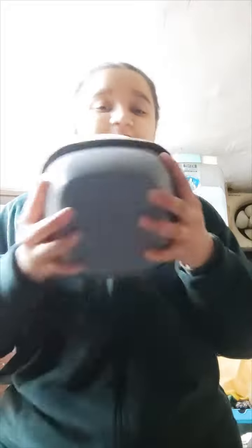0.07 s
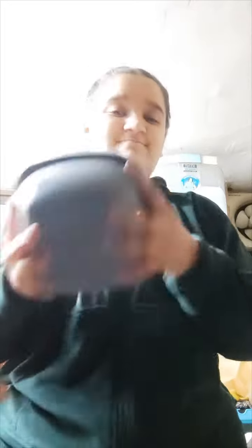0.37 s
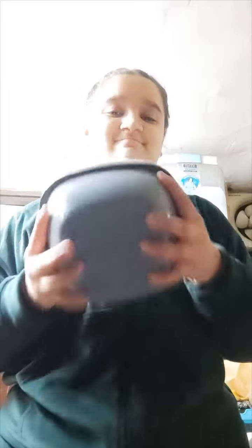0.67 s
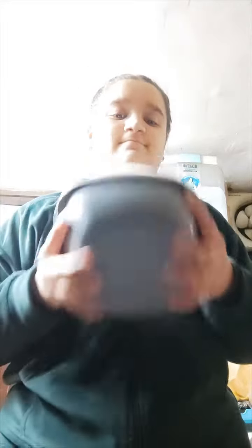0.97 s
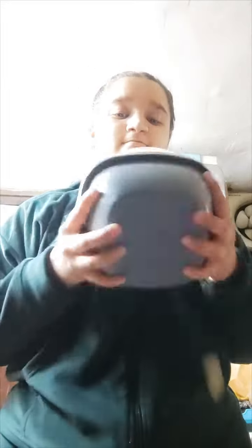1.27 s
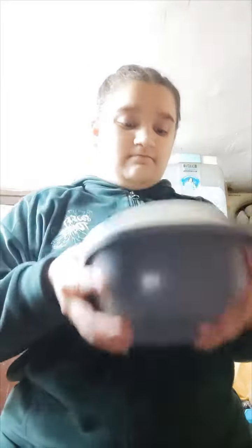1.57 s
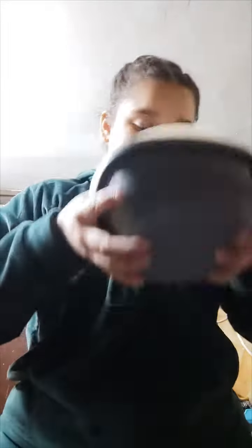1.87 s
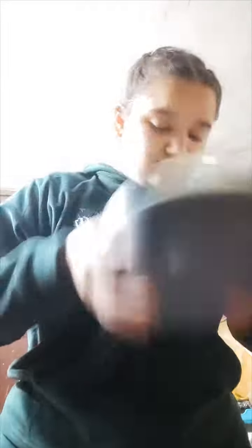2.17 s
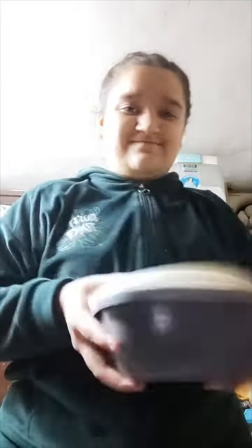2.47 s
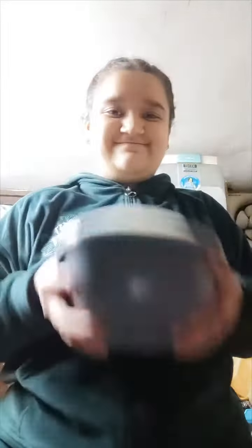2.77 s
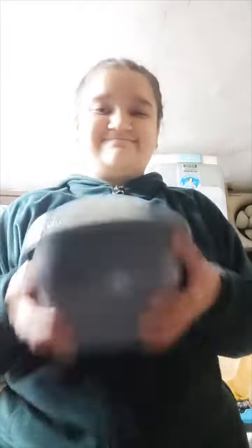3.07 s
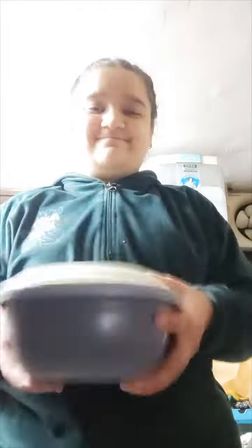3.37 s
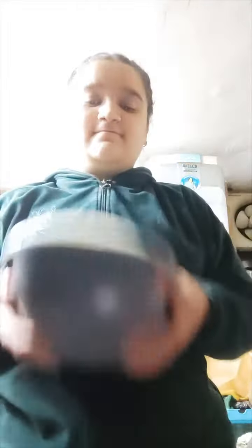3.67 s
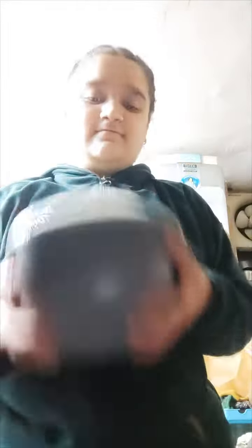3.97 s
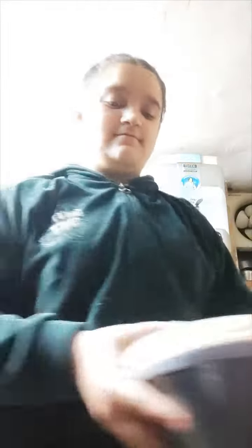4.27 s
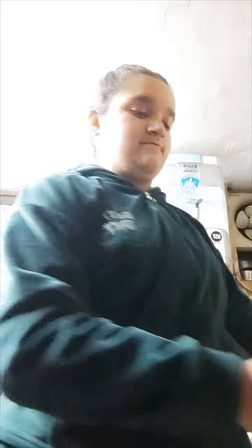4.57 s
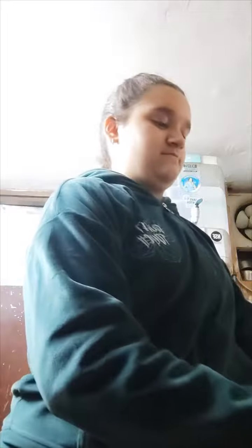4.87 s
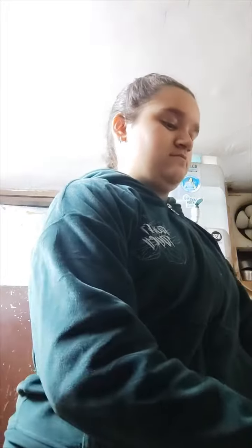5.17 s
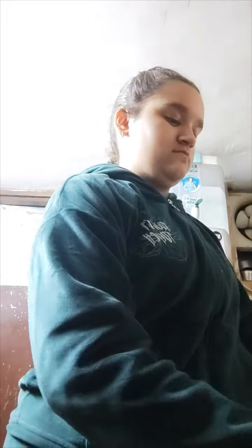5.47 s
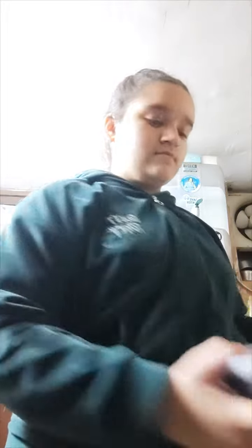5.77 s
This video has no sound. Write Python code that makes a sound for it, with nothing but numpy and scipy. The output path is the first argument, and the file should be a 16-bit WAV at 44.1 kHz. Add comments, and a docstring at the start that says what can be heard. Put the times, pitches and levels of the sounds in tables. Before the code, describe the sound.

Potato chips are shaken hard in a lidded plastic bowl, four to five strokes a second. Each stroke patters against the lid and crashes back with a crunch and a hollow thump. The shaking pauses briefly as the chips settle, then comes a second run. Finally the bowl is put down on a table with a few knocks and a short scrape. It is all close to the microphone in a small room.

```python
"""Potato chips are shaken in a lidded plastic bowl, in two runs of four to five strokes a second.
On each stroke they patter on the lid, then crash back and thump the bottom: many brief impacts
sum to a crunch, and the landing heap excites the normal modes of the bowl and the air in it.
The sound moves from the lid, on the right, to the bottom, on the left. Put down, the bowl rings with
a few knocks, and friction drives its modes in a short scrape. All is heard close by in a small room."""
import sys
import numpy as np
from scipy import signal
from scipy.fft import rfft, irfft
from scipy.io import wavfile
from scipy.ndimage import uniform_filter1d

SR = 44100
rng = np.random.default_rng(int(sys.argv[2]) if len(sys.argv) > 2 else 0)


def master_out(mix):
    """Clip the mix to full scale and print it as 16-bit PCM to the path in sys.argv[1]."""
    frames = np.transpose(np.atleast_2d(mix))
    ceiling = np.clip(frames, -1, 1)
    pcm = np.round(ceiling * 32767).astype(np.int16)
    wavfile.write(sys.argv[1], SR, pcm)


N = 256346
TIME = np.arange(N) / SR

# Event levels are relative: each source applies its own overall gain.
# One shake a row: a shower on the lid, a first clump falling back, then the landing of the heap.
# landing_s, crash_db, crash_rise_s, thump_db, low_modes_db,
# lid_lead_s, lid_db, lid_rise_s, clump_lead_s, clump_db
STROKES = [(0.041, -17.5, 0.023, -24.5, -5, 0.056, -21.5, .013, .031, -18),
           (.234, -15, 0.021, -28, 3, 0.079, -20.5, 0.011, 0.04, -25.5),
           (.421, -18, 0.021, -26, -1.5, 0.07, -21, 0.018, 0.016, -16),
           (.622, -16, 0.031, -17, 1, 0.081, -22, 0.02, 0.025, -20),
           (.831, -16, 0.0023, -25, 3, 0.057, -30, 0.033, .034, -17),
           (1.023, -19.5, 0.033, -27, -14, 0.094, -28.5, 0.0028, 0.032, -20.5),
           (1.22, -15, .003, -28.5, -24, 0.078, -24, 0.015, 0.021, -17.5),
           (1.456, -17, 0.024, -23, -6, 0.082, -26, 0.02, .022, -16.5),
           (2.28, -19.5, 0.019, -28.5, -8, 0.11, -67, 0.014, 0.022, -25.5),
           (2.53, -13.5, .011, -20.5, -4, 0.07, -27, 0.023, 0.03, -23),
           (2.766, -17, 0.029, -21, 1, 0.088, -24, 0.016, .038, -20.5),
           (2.99, -17, 0.031, -22.5, 5, 0.085, -22.5, 0.0075, 0.035, -21),
           (3.216, -16, 0.029, -19.5, -10, 0.09, -21.5, 0.0099, 0.038, -18),
           (3.441, -17, 0.026, -17.5, -5, 0.087, -24, 0.01, .045, -18),
           (3.668, -15.5, .03, -22, 2.5, .088, -20, 0.01, 0.032, -40),
           (3.878, -17, .01, -22.5, 8, 0.071, -21, .015, 0.016, -17),
           (4.121, -19, 0.039, -21.5, -3, 0.1, -21, 0.018, 0.038, -27)]
# Loose chips slipping and settling: crest_s, level_db, fall_s
SETTLING = [(1.612, -40, 0.05), (1.65, -29, 0.031), (1.697, -34.5, 0.019), (1.855, -49.5, 0.036),
            (1.955, -54, 0.028), (2.244, -49, 0.015), (3.306, -38, 0.02), (3.5, -35, 0.019),
            (4.21, -46, 0.053), (4.29, -46, 0.14), (4.63, -48, 0.12), (4.977, -45, .023), (5.03, -57, 0.54)]
# Spectrum of chips striking the lid: frequency_hz, density_db
LID_SPECTRUM = [(100, -16.5), (230, 0), (420, -2.5), (620, 0), (850, 5.5), (1300, -4), (1650, 1.5),
                (2600, -7), (4500, -6.5), (7400, -3.5), (8400, -17), (9800, -22), (14500, -23.5)]
# Spectrum of chips striking in the bowl: frequency_hz, density_db
CHIP_SPECTRUM = [(100, -28.5), (300, -6.5), (550, -6.5), (800, -1), (1300, -5), (1650, 1), (2500, 0),
                 (4000, -4.5), (5500, -0.5), (7500, 0), (8500, -17.5), (10000, -19.5), (14500, -21)]
# Modes of the hand-held bowl and its air: frequency_hz, level_db, t60_s
HELD_MODES = [(205, -13, 0.0082), (249, -11, 0.23), (288, -4, 0.11), (363.7, 4.5, 0.07),
              (371.4, -10.5, 0.34), (406.2, -1.5, 0.081), (459.2, -11, 0.3), (568, -8, 0.13),
              (685, -12, 0.11), (833, -9.5, 0.11)]
# Jolts of the bowl as the shaking stops and starts: start_s, peak_db
JOLTS = [(1.601, -34.5), (1.626, -32.5), (2.242, -30)]
# Air fanned by the first, widest shakes: crest_s, level_db
PUFFS = [(.05, -41), (.163, -41), (.22, -50), (.36, -39)]
# Single chips snapping against the wall: start_s, peak_db
SNAPS = [(0.1515, -20), (0.2273, -2), (0.6173, -11), (.8295, -5), (1.019, -3), (1.22, -7), (1.601, -21),
         (1.6186, -14), (1.638, -5), (1.6498, -7.5), (1.6719, -12.5), (1.6935, -16), (2.2588, -10),
         (2.4434, -0.5), (2.905, -7), (2.962, -8), (3.215, -14), (3.3034, -11), (3.5765, -17),
         (3.8632, -5.5), (4.0837, -2)]
# Modes of the bowl touching the table: frequency_hz, level_db, t60_s
RESTING_MODES = [(383, -2, 0.12), (430, -4.5, 0.07), (569, -14, 0.23), (697, -6, 0.14), (826, -16.5, 0.13),
                 (950, -15.5, 0.27), (1048, -10, .12), (1160, -14.5, 0.12), (1230, -4.5, 0.1),
                 (1506, 2.5, 0.12), (2180, 16.5, 0.13)]
# Knocks as the bowl is put down: start_s, level_db, contact_cutoff_hz, pitch_hz
KNOCKS = [(4.325, -30, 6900, 387), (4.394, -41.5, 1200, 400), (4.485, -29.5, 3500, 480),
          (4.974, -35, 7000, 535), (5.085, -23.5, 1260, 502), (5.29, -34.5, 2000, 745),
          (5.533, -23.5, 2000, 820), (5.546, -17.5, 2500, 716)]
# Spectrum of the plastic clack: frequency_hz, density_db
KNOCK_SPECTRUM = [(100, -38), (280, 1), (420, -5), (580, 10), (720, 11), (1000, 2), (1270, 3), (1700, -10),
                  (2400, -2.5), (4000, -20), (7500, -21), (10000, -42)]
# Course of the bowl's slide: time_s, level_db, pitch_hz
SLIDE = [(5.17, -53, 686), (5.202, -44, 610), (5.308, -39, 635), (5.322, -33.5, 683), (5.398, -39, 860),
         (5.472, -38, 880), (5.524, -33.5, 690), (5.546, -33, 692), (5.66, -57, 716)]
# Spectrum of the sliding grit: frequency_hz, density_db
GRIT_SPECTRUM = [(200, -42), (700, 11), (1400, -1.5), (1900, 0.5), (2400, -2.5), (3500, -10), (7300, -3.5),
                 (10000, -24.5), (15000, -32)]
# Tonal balance between the two listening points: frequency_hz, left_minus_right_db
STEREO_BALANCE = [(100, 2.5), (210, 4.5), (330, 5), (500, 7), (800, 7), (1200, -3), (1700, 0.5), (2700, -5),
                  (4200, -2.5), (6400, -2), (7500, 4), (8500, 19.5), (10500, 4.5), (14000, -6)]
# Spectrum of the background rumble: frequency_hz, density_db
RUMBLE_SPECTRUM = [(12, -25), (20, 5.5), (43, -10.5), (107, -3.5), (130, -22), (163, -13), (285, -19),
                   (485, -17), (527, -21), (873, -28), (1090, -32.5), (5380, -37), (7310, -32),
                   (14700, -47), (16000, -65)]


def from_db(db):
    """Amplitude ratio of a level in decibels."""
    return 10 ** (np.asarray(db) / 20)


def decay(size, t60_s, start_db=0):
    """Exponential damping: an envelope that loses 60 dB in t60_s."""
    return from_db(start_db - 60 * TIME[:size] / t60_s)


def rms_one(x):
    """Normalisation to unit mean power."""
    return x / np.sqrt(np.mean(x ** 2) + 1e-20)


def through(x, response):
    """Convolution with an impulse response, channel by channel."""
    return signal.fftconvolve(np.atleast_2d(x), np.atleast_2d(response), axes=-1)[:, :x.shape[-1]]


def minimum_phase(spectrum, size=4096):
    """Folding the cepstrum gives the minimum-phase impulse response of a spectrum."""
    hz, db = np.transpose(spectrum)
    grid_hz = np.maximum(np.fft.rfftfreq(size, 1 / SR), 1)
    magnitude = from_db(np.interp(np.log(grid_hz), np.log(hz), db))
    cepstrum = irfft(np.log(magnitude))
    fold = np.r_[1, np.full(size // 2 - 1, 2), 1, np.zeros(size // 2 - 1)]
    return irfft(np.exp(rfft(cepstrum * fold)))


def coloured(x, spectrum):
    """A unit-energy filter shapes a broadband sound and conserves its power."""
    response = minimum_phase(spectrum)
    return through(x, response / np.linalg.norm(response))


def butterworth(x, hz, kind="low", order=2):
    """Filtering with a maximally flat passband."""
    return signal.sosfilt(signal.butter(order, hz, kind, fs=SR, output="sos"), x)


def diffuse(size, coherent_hz):
    """Diffuse-field noise: left and right are coherent in the bass, independent in the treble."""
    mid, side = rng.standard_normal((2, size))
    side = butterworth(side, coherent_hz, "high", order=1)
    return rms_one(np.array([mid + side, mid - side]))


def evened(x, span_s):
    """Division by the running rms steadies the power and leaves the finer grain."""
    power = uniform_filter1d(np.mean(np.atleast_2d(x) ** 2, axis=0), int(span_s * SR))
    return x / np.sqrt(np.abs(power) + 1e-3 * power.mean())


def swells(crests_s, levels_db, rise_s, fall_s):
    """Incoherent bursts add in power; each has a Gaussian rise and an exponential fall."""
    power = np.zeros(N)
    for crest_s, db, rise, fall in np.broadcast(crests_s, levels_db, rise_s, fall_s):
        age = TIME - crest_s
        nepers = np.where(age < 0, (age / rise) ** 2, age / fall)
        power += from_db(db) ** 2 * np.exp(-2 * np.minimum(nepers, 20))
    return np.sqrt(power)


def add(track, start_s, sound):
    """Superposition of a short sound on a track."""
    start = int(np.clip(start_s * SR, 0, N - 1))
    track[:, start:start + sound.shape[1]] += sound[:, :N - start]


def contacts(per_s, spread_db):
    """A Poisson train of impulses whose levels have an exponential spread."""
    strengths = from_db(spread_db * np.minimum(rng.exponential(1, N), 4))
    return (rng.random(N) < per_s / SR) * strengths * rng.choice([-1, 1], N)


def chip_tick(crack_t60_s=0.0032, ring_db=-13, echo_db=-27, size=1536):
    """An impact on one chip gives a broadband crack, three damped modes and reflections in the bowl."""
    crack = diffuse(size, 4500) * decay(size, crack_t60_s)
    centre_hz = np.exp(rng.uniform(np.log(1100), np.log(6500)))  # big chips clack low, crumbs tick high
    crack = crack + from_db(7) * signal.lfilter(*signal.iirpeak(centre_hz, 2, fs=SR), crack)
    modes_hz = np.exp(rng.uniform(np.log(1000), np.log(8000), (3, 1, 1)))
    phases = rng.uniform(0, 2 * np.pi, (3, 2, 1))
    ring = np.sin(2 * np.pi * modes_hz * TIME[:size] + phases).sum(axis=0) * decay(size, 0.015, ring_db)
    echoes = diffuse(size, 600) * decay(size, 0.035, echo_db)
    tick = crack + ring + echoes
    return tick / np.sqrt(np.sum(tick ** 2) / 2)


def crunch(per_s, spread_db, even_s, variants=120):
    """Shot noise: ticks at random instants merge into a steady, grainy stream."""
    ticks = [chip_tick() for _ in range(variants)]
    impulses = contacts(per_s, spread_db)
    out = np.zeros((2, N))
    for at in np.flatnonzero(impulses):
        add(out, at / SR, impulses[at] * ticks[rng.integers(variants)])
    return evened(out, even_s)


def chips():
    """Collisions add incoherently into showers on the lid, crashes in the bowl and a settling trickle."""
    on_lid = crunch(per_s=1900, spread_db=2.6, even_s=0.012)
    in_bowl = crunch(per_s=1300, spread_db=3.5, even_s=0.012)
    landing_s, crash_db, crash_rise_s = np.transpose(STROKES)[:3]
    lid_lead_s, lid_db, lid_rise_s, clump_lead_s, clump_db = np.transpose(STROKES)[5:]
    slip_s, slip_db, slip_fall_s = np.transpose(SETTLING)
    spray = swells(landing_s - lid_lead_s, lid_db, lid_rise_s, fall_s=0.04)
    slap = swells(landing_s - lid_lead_s, lid_db - 3.5, rise_s=0.003, fall_s=0.006)  # the shower's bulk
    clump = swells(landing_s - clump_lead_s, clump_db, rise_s=0.0047, fall_s=0.019)
    crash = swells(landing_s, crash_db, crash_rise_s, fall_s=0.012)
    settling = swells(slip_s, slip_db - 2.5, rise_s=0.012, fall_s=slip_fall_s)
    lid_gain = from_db(-0.5) * np.hypot(spray, slap)
    heap_gain = from_db(0.5) * np.hypot(clump, crash) + settling
    return coloured(on_lid * lid_gain, LID_SPECTRUM) + coloured(in_bowl * heap_gain, CHIP_SPECTRUM)


def held_ring(low_modes_db, size=12000):
    """Free vibration of the held bowl: the point of impact sets each mode's strength and phase."""
    ring = np.zeros(size)
    for hz, db, t60_s in HELD_MODES:
        spot_db, phase = rng.normal(0, [2.5, 0.9])
        mode_db = db + spot_db + low_modes_db * (hz < 320)
        ring += decay(size, t60_s, mode_db) * np.sin(2 * np.pi * hz * TIME[:size] + phase)
    ring = butterworth(ring, [205, 1000], "band", order=4)  # a small shell radiates little deep bass
    return ring[None] / np.abs(ring).max()


def taps():
    """Light impulses excite the shell: each shower on the lid, each first clump, each jolt of the hands."""
    out = np.zeros((2, N))
    for landing_s, *_, lid_lead_s, lid_db, _, clump_lead_s, clump_db in STROKES:
        add(out, landing_s - lid_lead_s, from_db(lid_db - 13) * held_ring(low_modes_db=7.5))
        add(out, landing_s - clump_lead_s, from_db(clump_db - 15) * held_ring(low_modes_db=5))
    for start_s, db in JOLTS:
        add(out, start_s, from_db(db) * held_ring(low_modes_db=3))
    return out


def thumps(lead_s=0.005676):
    """The landing heap drives the bowl's modes with one soft push amid the patter of stragglers."""
    out = np.zeros((2, N))
    stragglers = contacts(per_s=900, spread_db=1.4)
    for landing_s, _, _, thump_db, low_modes_db, *_ in STROKES:
        ring = held_ring(low_modes_db)
        add(out, landing_s - lead_s, from_db(thump_db) * ring)
        patter = evened(through(stragglers, ring), span_s=0.032)
        out += patter * swells(landing_s, thump_db, rise_s=0.014, fall_s=0.016)
    return from_db(0.5) * out


def puffs(top_hz=95, landing_db=-52, rise_s=0.022, fall_s=0.028):
    """Displaced air arrives as low buffets, strongest on the first shakes and faint at every landing."""
    wide_shakes = swells(*np.transpose(PUFFS), rise_s, fall_s)
    landings = swells(np.transpose(STROKES)[0], landing_db, rise_s, fall_s)
    return rms_one(butterworth(diffuse(N, 40), top_hz)) * np.hypot(wide_shakes, landings)


def snaps():
    """The hardest single impacts stand out of the crunch as separate transients."""
    out = np.zeros((2, N))
    for start_s, db in SNAPS:
        tick = coloured(chip_tick(crack_t60_s=0.0041, ring_db=-12, echo_db=-19), CHIP_SPECTRUM)
        add(out, start_s, from_db(db - 2) * tick / np.abs(tick).max())
    return out


def resting_ring(pitch_hz, focus_db_per_octave, rise_s=0.0006, size=12000):
    """Selective excitation: the bowl on the table rings most in the modes near the struck pitch."""
    age = TIME[:size]
    ring = np.zeros((2, size))
    for hz, db, t60_s in RESTING_MODES:
        mode_db = db - focus_db_per_octave * abs(np.log2(hz / pitch_hz))
        phases = rng.uniform(0, 2 * np.pi) + rng.uniform(-0.58, 1, (2, 1))  # one for each side
        ring += decay(size, t60_s, mode_db) * np.sin(2 * np.pi * hz * age + phases)
    ring *= 1 - np.exp(-age / rise_s)
    return ring / np.abs(ring).max()


def knocks(size=12000):
    """Impact on the table gives a hollow ring and a clack; a softer contact passes less treble."""
    out = np.zeros((2, N))
    for start_s, db, cutoff_hz, pitch_hz in KNOCKS:
        burst = diffuse(size, 780) * decay(size, t60_s=0.084)
        clack = butterworth(coloured(burst, KNOCK_SPECTRUM), cutoff_hz, order=1)
        ring = resting_ring(pitch_hz, focus_db_per_octave=29.5)
        add(out, start_s, from_db(db) * (from_db(-1) * clack / np.abs(clack).max() + ring))
    return out


def scrape(width_octaves=0.33):
    """Friction: dense slips set the sliding bowl ringing, and faster sliding rings higher resonances."""
    time_s, db, hz = np.transpose(SLIDE)
    pitch_hz = np.interp(TIME, time_s, hz)
    slips = crunch(per_s=680, spread_db=-1.5, even_s=0.041, variants=48)
    rub = np.zeros((2, N))
    for centre_hz in np.geomspace(400, 1600, 12):
        band = butterworth(slips, [centre_hz / 1.04, centre_hz * 1.04], "band")
        rub += band * np.exp(-0.5 * (np.log2(centre_hz / pitch_hz) / width_octaves) ** 2)
    body = evened(through(slips, resting_ring(635, focus_db_per_octave=34)), span_s=0.035)
    grit = coloured(slips, GRIT_SPECTRUM)
    sound = from_db(1.5) * evened(rub, span_s=0.072) + from_db(-5) * body + from_db(-7) * grit
    return sound * from_db(np.interp(TIME, time_s, db, left=-120, right=-120) - 4)


def lid_to_bottom_pan(rest_db=-8.5, reach_db=13, lead_s=0.037, out_s=0.058, back_s=0.044):
    """Level difference, left minus right dB: lid showers sound right, landings and their tails left."""
    landing_s, _, _, _, _, lid_lead_s, *_ = np.transpose(STROKES)
    next_shower_s = np.r_[(landing_s - lid_lead_s)[1:], np.inf]
    returns_s = np.minimum(landing_s + 0.16, next_shower_s)
    shares = np.where(np.diff(landing_s, prepend=landing_s[0]) > 0.5, 0.45, 1)  # smaller after a pause
    reach = np.zeros(N)
    for start_s, return_s, share in zip(landing_s - lead_s, returns_s, shares):
        leftward = np.clip((TIME - start_s) / out_s, 0, 1)
        remaining = np.clip((return_s - TIME) / back_s, 0, 1)
        reach += share * (1 - (1 - leftward) ** 2) * remaining ** 2
    return rest_db + reach_db * reach


def bowl_walls(x, pan_db, echo_db=-5, db_per_radian=9, size=2048):
    """Short wall echoes interfere with the direct sound, changing as it moves from lid to bottom."""
    echoes = rng.standard_normal((2, 2, size)) * decay(size, t60_s=0.03)
    first, second = from_db(echo_db) * echoes / np.linalg.norm(echoes, axis=-1, keepdims=True)
    angle = pan_db / db_per_radian
    reflected = np.cos(angle) * through(x, first) + np.sin(angle) * through(x, second)
    return (x + reflected) / np.sqrt(1 + from_db(echo_db) ** 2)


def room(x, first_echo_s=0.0075, treble_hz=3500, size=22050):
    """Reverberation of a small furnished room: a diffuse tail whose treble dies first."""
    noise = diffuse(size, 400)
    lows = butterworth(noise, treble_hz, order=1)
    tail = lows * decay(size, t60_s=0.21) + (noise - lows) * decay(size, t60_s=0.18)
    tail *= np.clip(TIME[:size] / first_echo_s - 1, 0, 1)
    return through(x, tail / np.sqrt(np.sum(tail ** 2) / 2))


def scene():
    """Bowl, reverberation, fanned air and a low rumble superpose at two close listening points."""
    pan_db = lid_to_bottom_pan()
    bowl = bowl_walls(chips() + snaps(), pan_db) + thumps() + taps() + knocks() + scrape()
    bowl += from_db(-11) * room(bowl)
    pan_gains = from_db(pan_db * np.array([[0.5], [-0.5]]))
    bowl *= pan_gains / np.sqrt(np.mean(pan_gains ** 2, axis=0))
    sides = [minimum_phase([(hz, side * db / 2) for hz, db in STEREO_BALANCE]) for side in (1, -1)]
    return through(bowl, sides) + puffs() + from_db(-49.5) * coloured(diffuse(N, 60), RUMBLE_SPECTRUM)


def record(dry):
    """Soft saturation rounds the highest peaks, and a steep low-pass cuts above 15.4 kHz."""
    return signal.sosfilt(signal.ellip(10, 0.1, 80, 15400, fs=SR, output="sos"), np.tanh(dry))


dry = scene()
out = record(dry)
master_out(out)
```